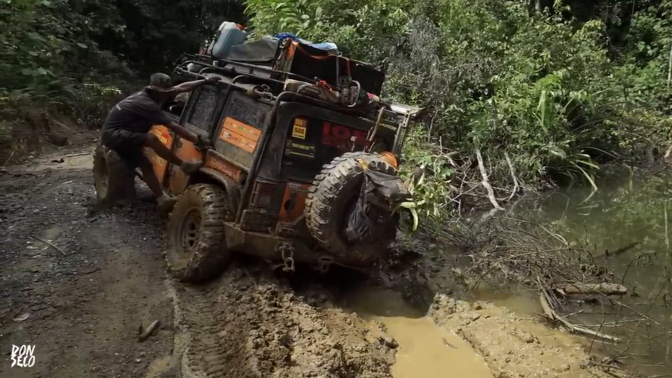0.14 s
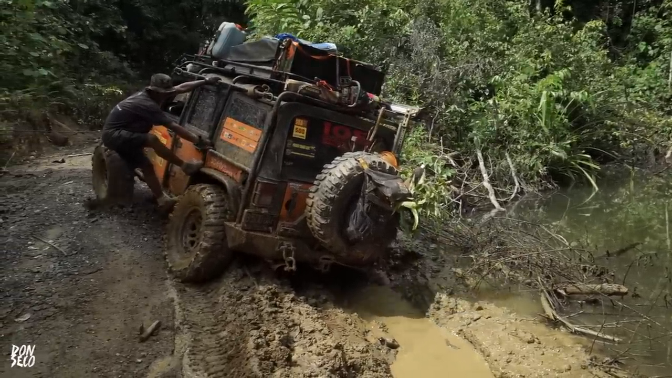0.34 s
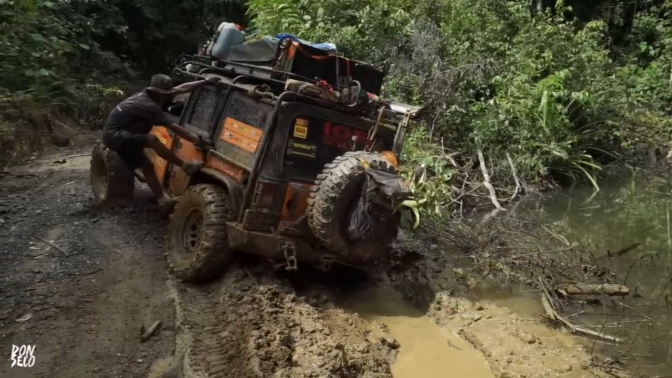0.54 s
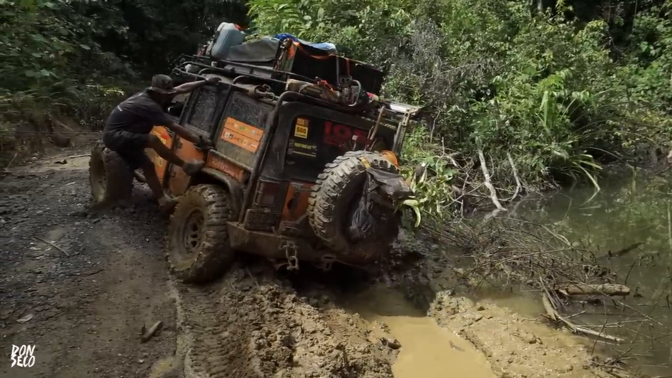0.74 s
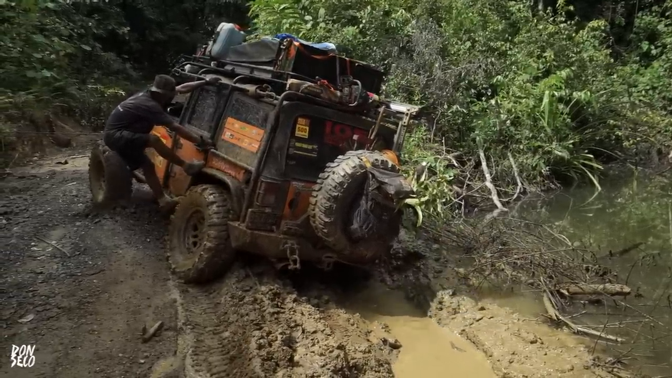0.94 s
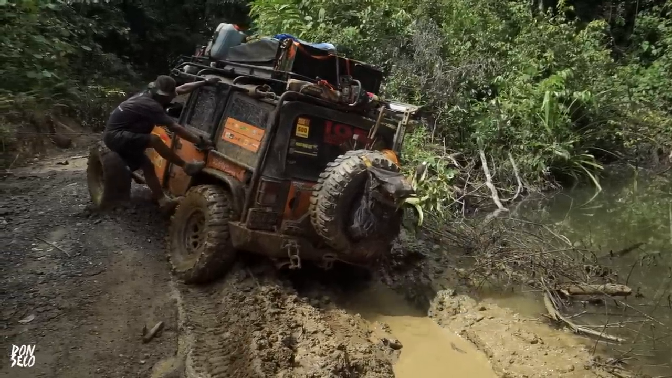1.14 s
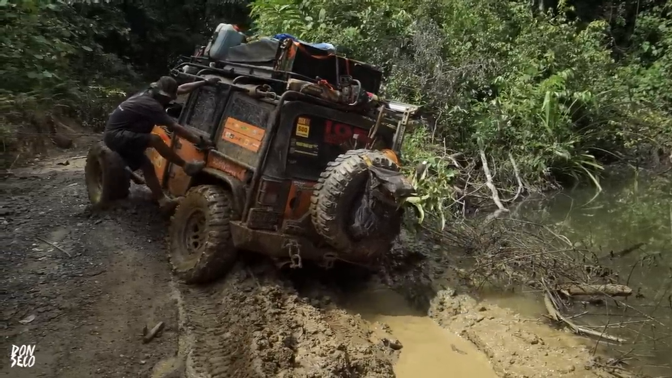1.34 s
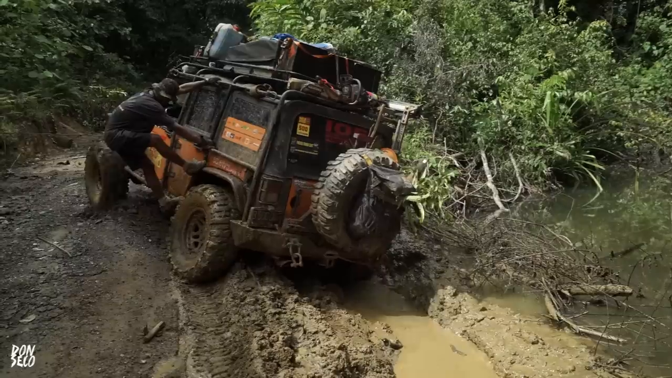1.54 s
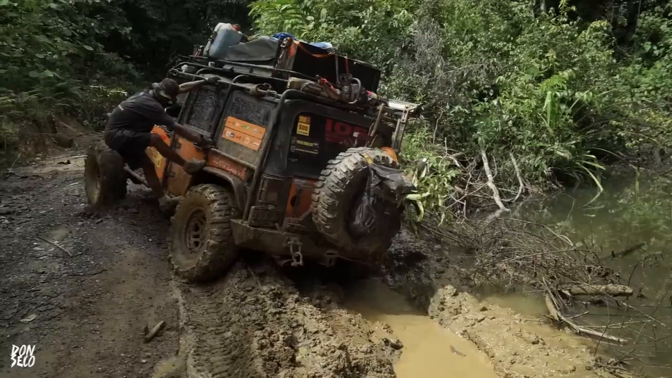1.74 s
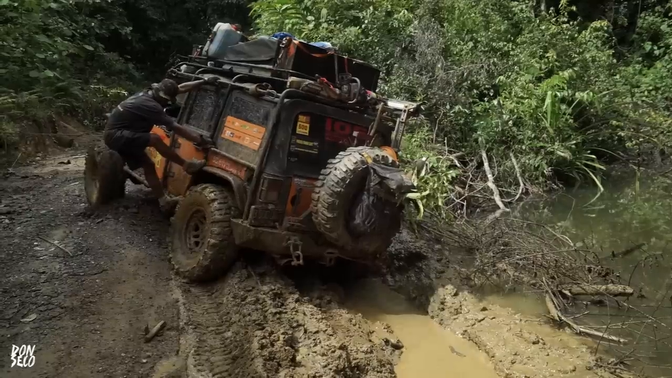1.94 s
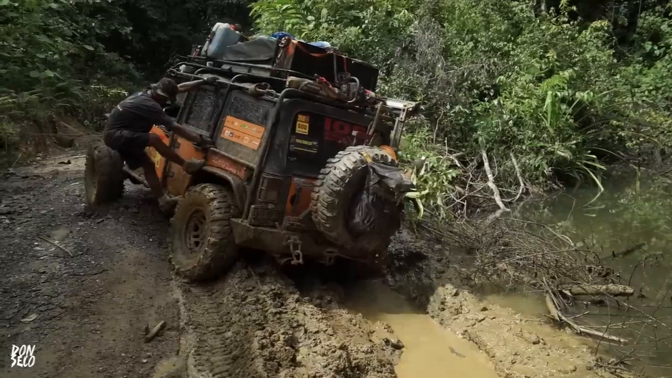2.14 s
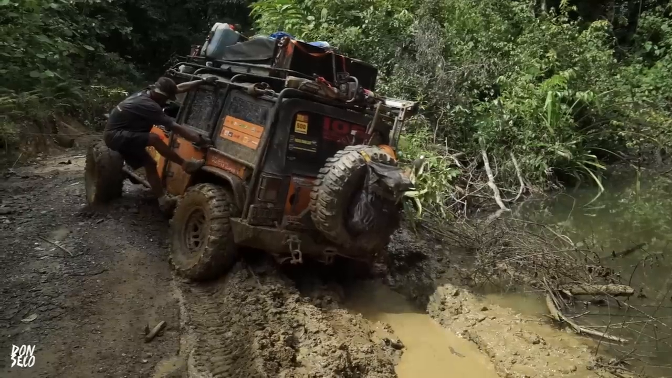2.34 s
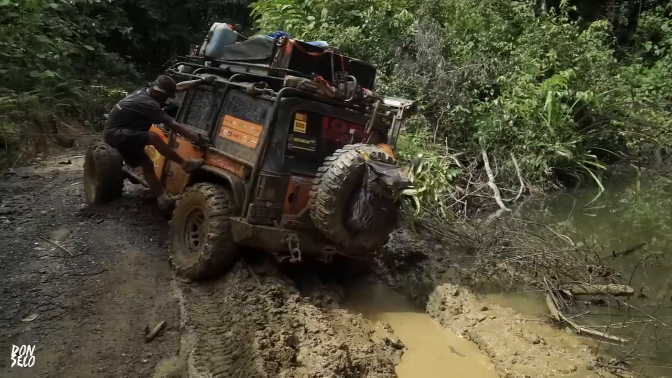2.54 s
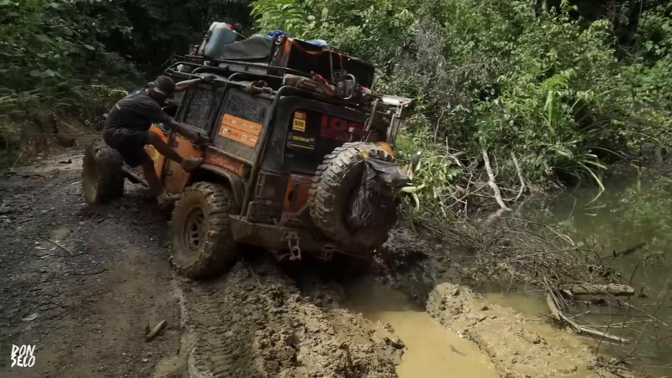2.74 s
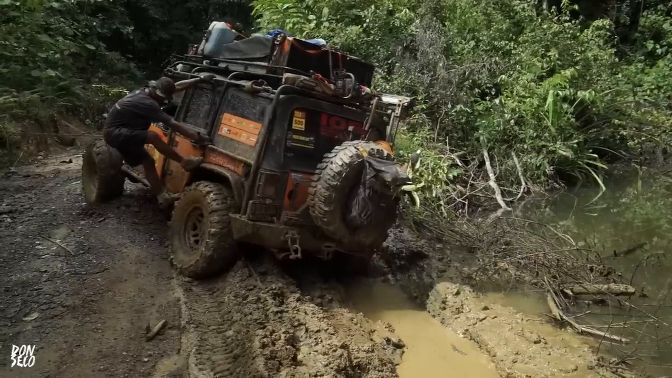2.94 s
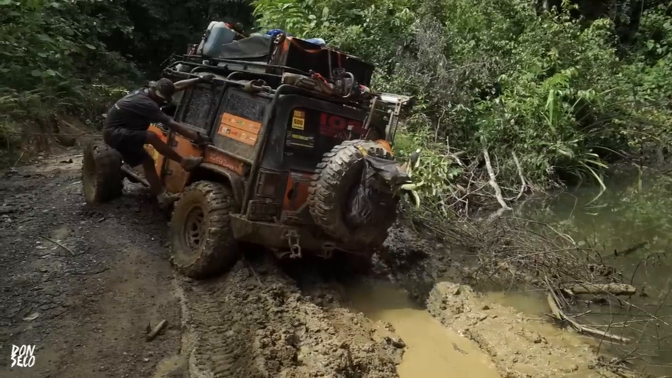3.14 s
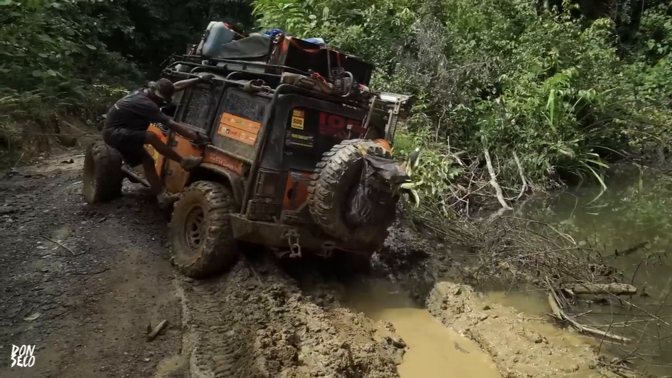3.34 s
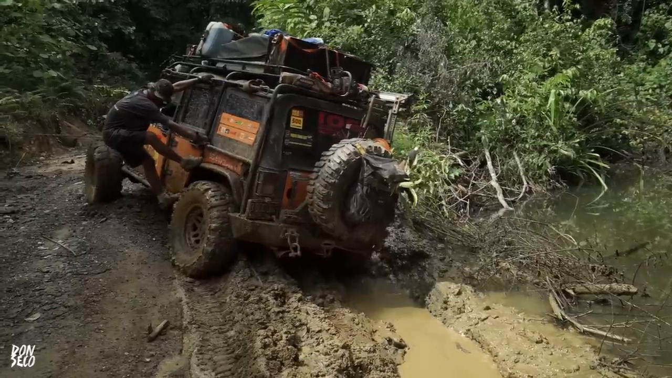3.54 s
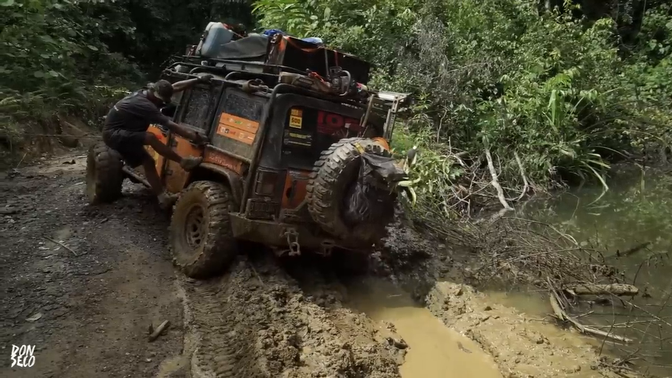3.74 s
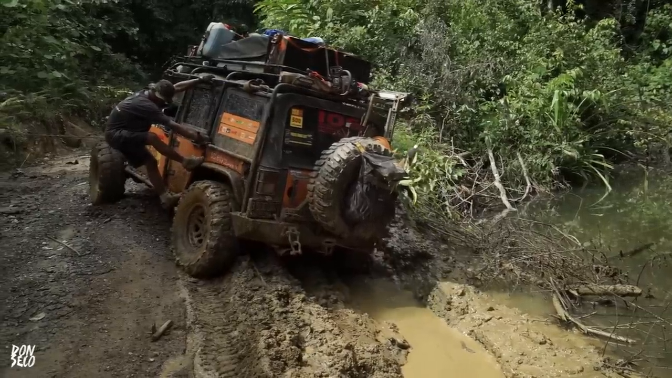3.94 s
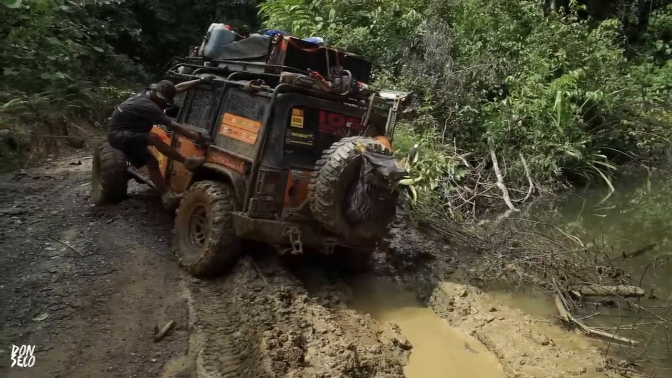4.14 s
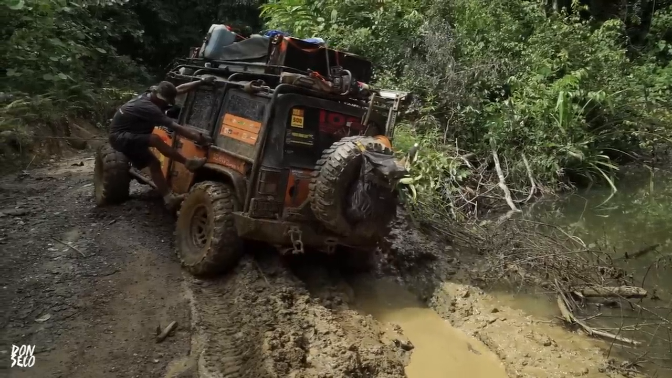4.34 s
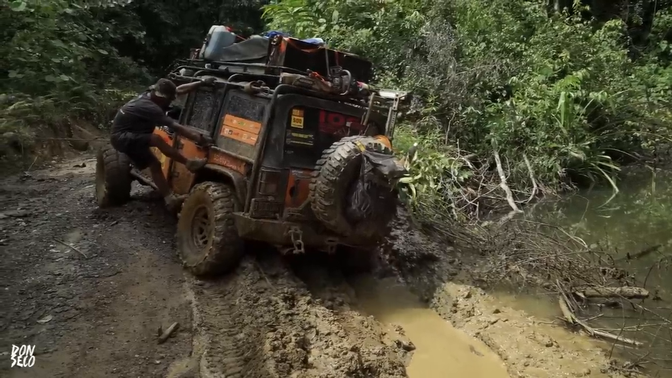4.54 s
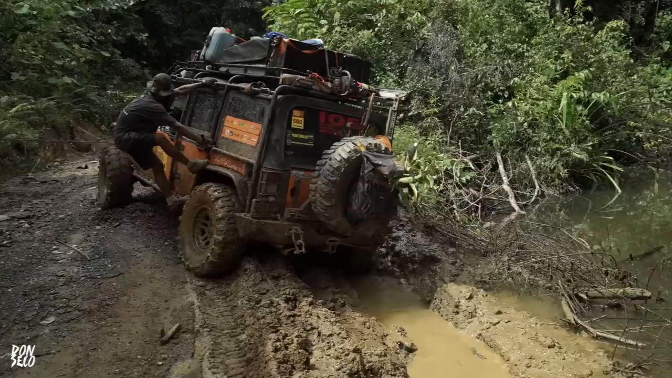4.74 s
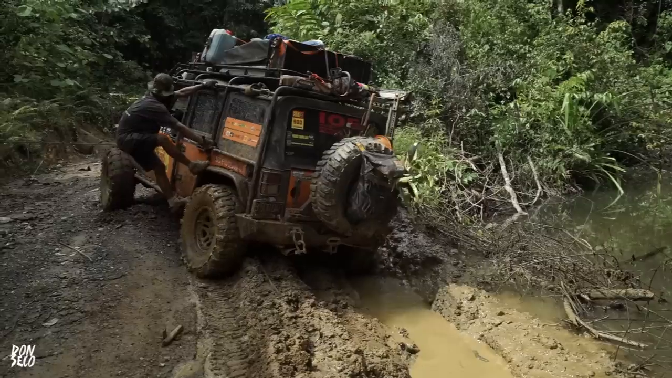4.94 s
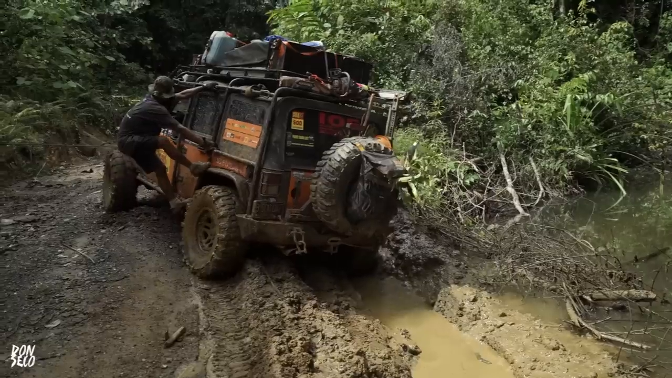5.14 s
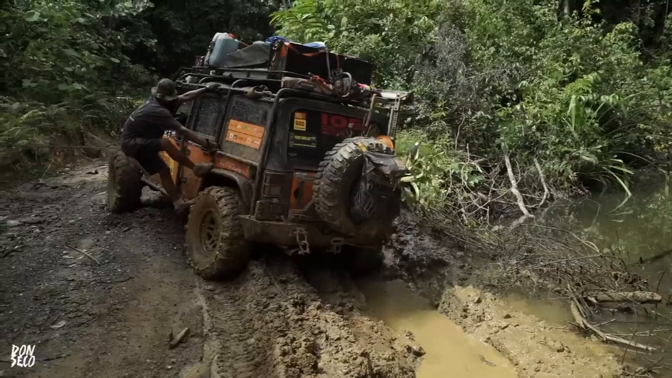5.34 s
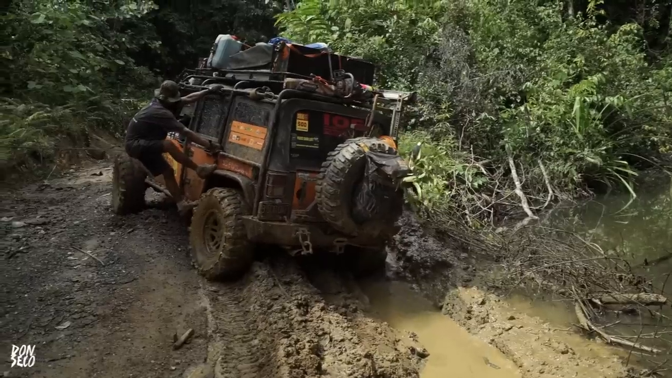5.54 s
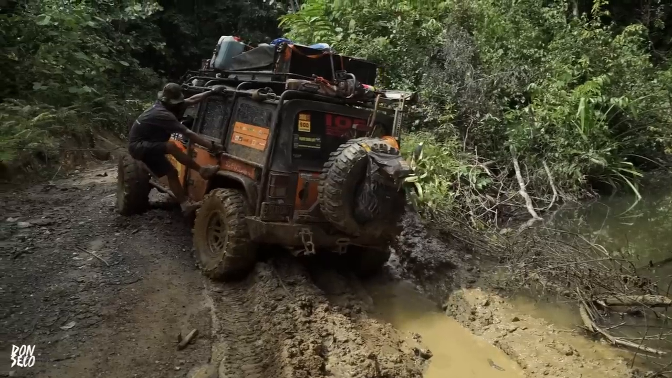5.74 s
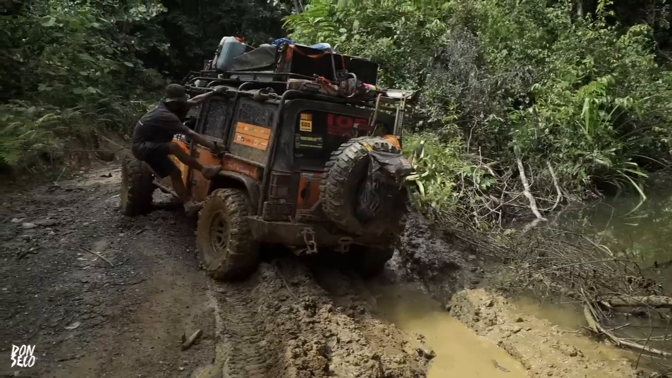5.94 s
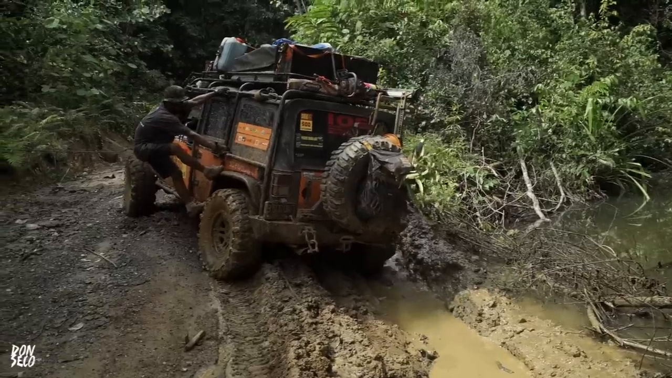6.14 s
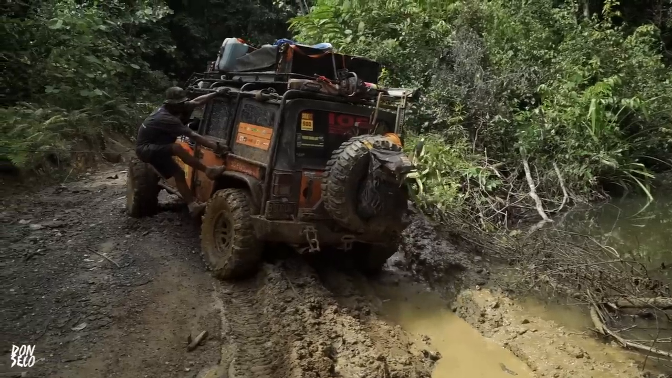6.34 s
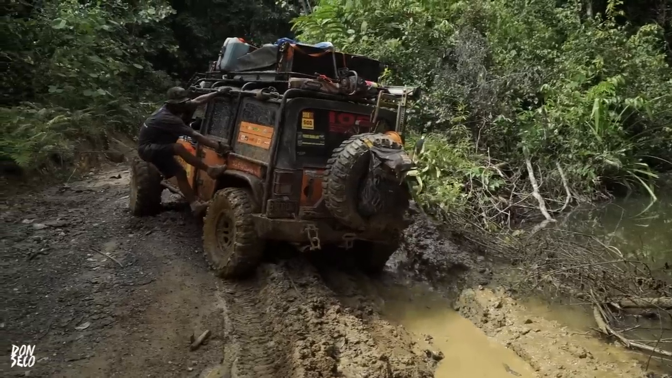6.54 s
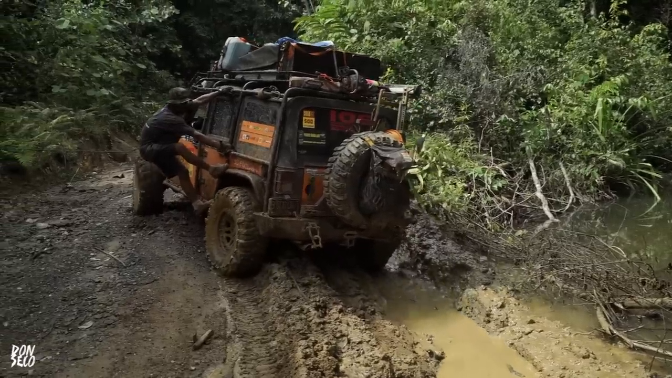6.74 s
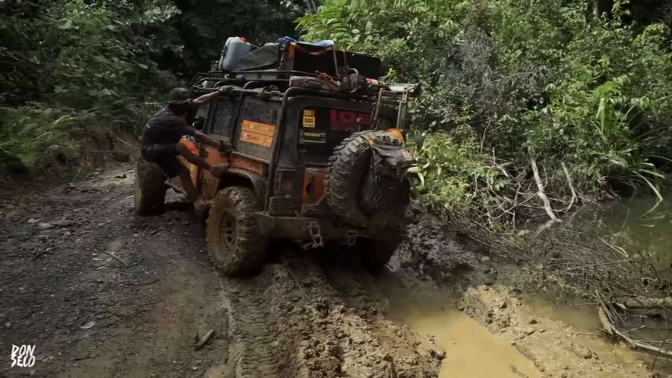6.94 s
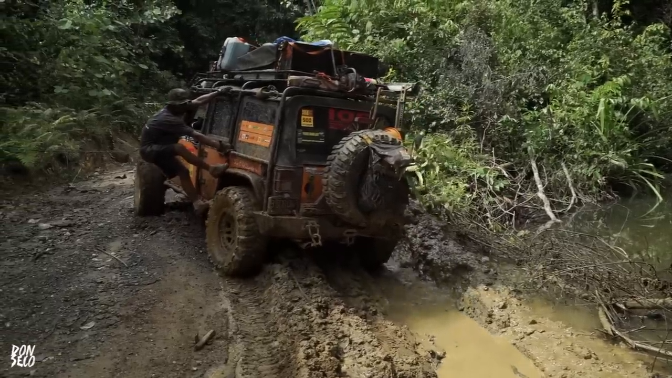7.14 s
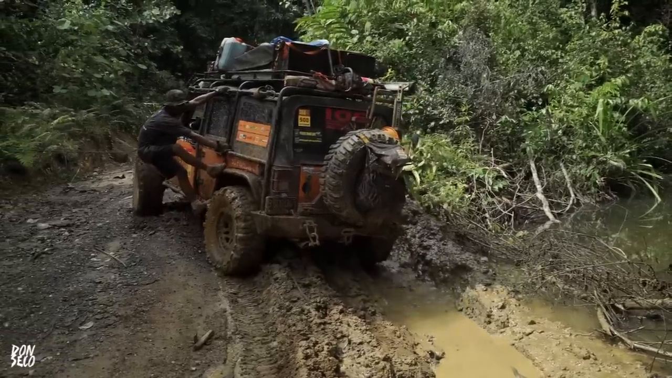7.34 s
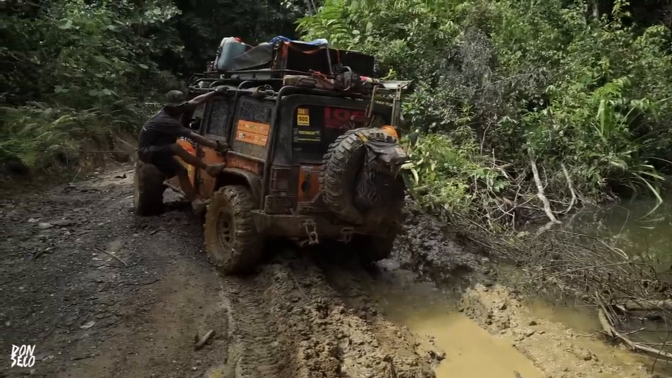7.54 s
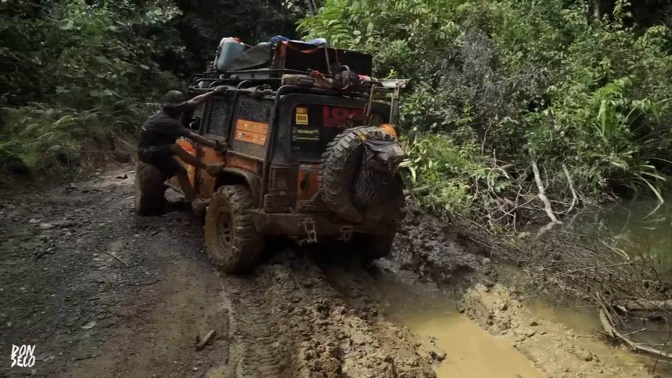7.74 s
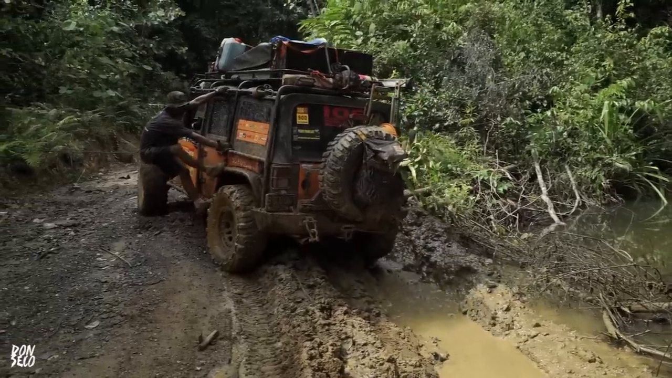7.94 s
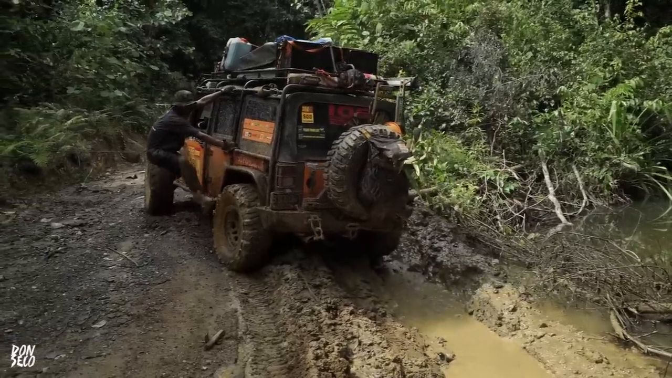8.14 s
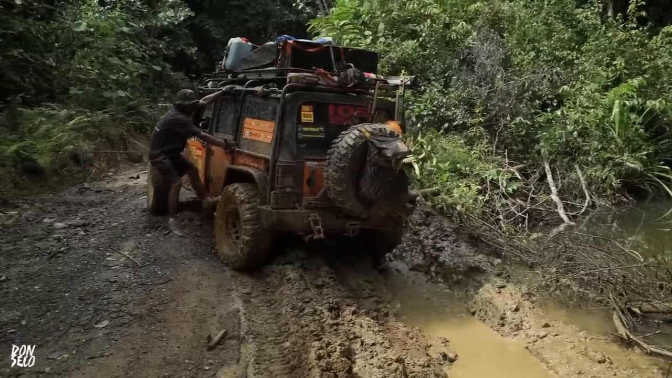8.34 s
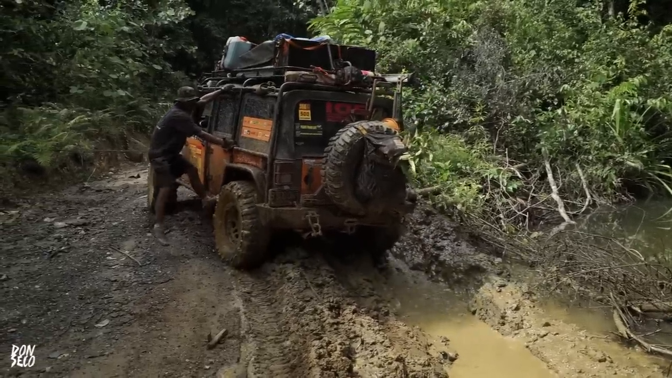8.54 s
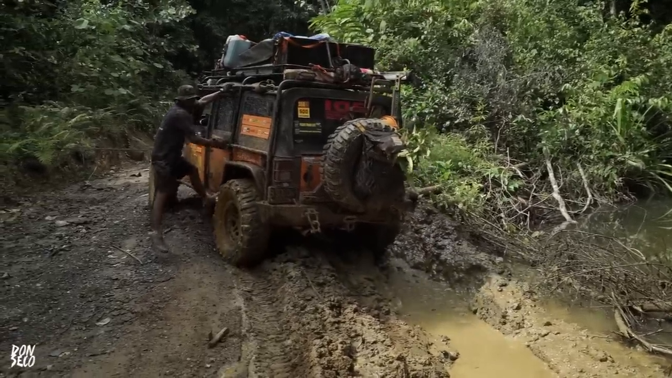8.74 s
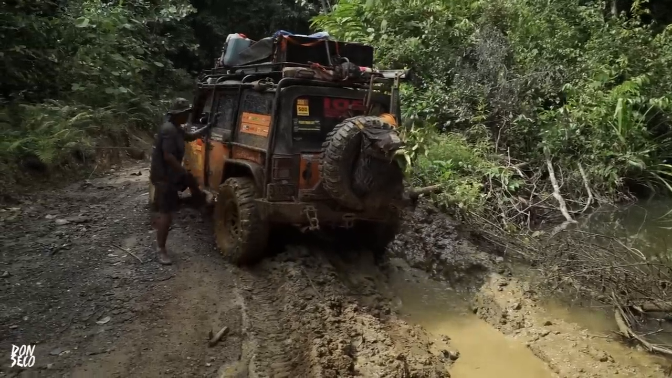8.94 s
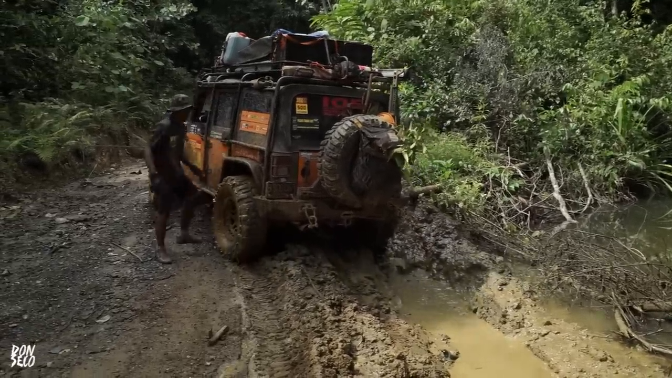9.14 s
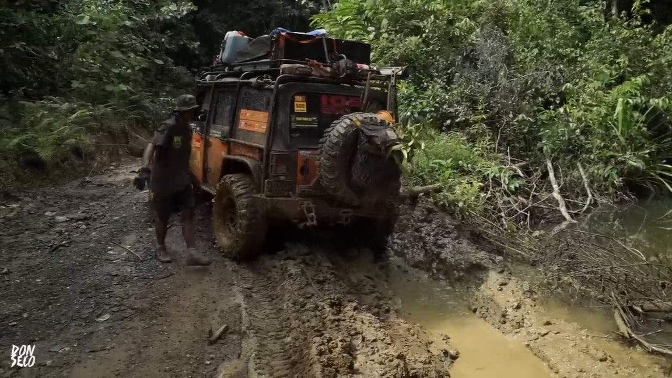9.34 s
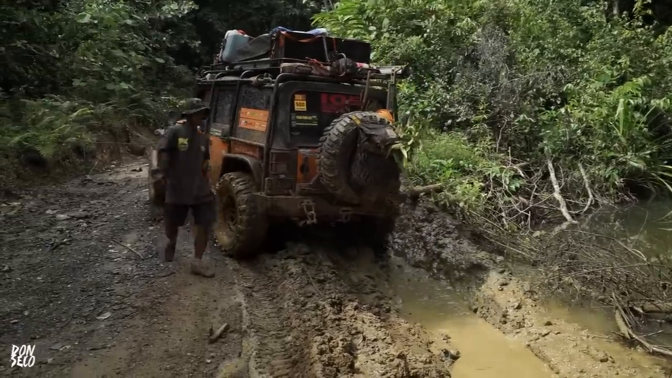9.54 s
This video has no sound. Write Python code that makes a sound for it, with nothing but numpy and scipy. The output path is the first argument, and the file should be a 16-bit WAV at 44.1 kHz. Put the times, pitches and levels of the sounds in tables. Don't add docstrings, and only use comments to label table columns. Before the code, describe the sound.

Continuous booming six-cylinder exhaust dominates, heard from behind the truck in the open, in mono with dull top treble. Revs begin high and raspy, slide down under load, settle into a deep uneven growl, recover slightly in the middle and fall away near the end. Loose driveline knocks cluster around two seconds; faint mud drops tick, one wet slap hits a panel late, with insects and low wind gusts barely audible.

```python
import sys
import numpy as np
from scipy import signal
from scipy.fft import rfft, irfft, next_fast_len
from scipy.io import wavfile
from scipy.ndimage import uniform_filter1d

SR = 44100
rng = np.random.default_rng(int(sys.argv[2]) if len(sys.argv) > 2 else 0)


def output_pcm(signal):
    pcm = np.clip(np.atleast_2d(signal).T, -1, 1) * 32767
    wavfile.write(sys.argv[1], SR, np.round(pcm).astype(np.int16))


def volts_from_db(level):
    exponent = np.asarray(level, float) / 20
    return 10 ** exponent


N = 422919

# start_s, firing_rate_hz, load_db, rasp_db
DRIVE = [(0, 186.2, -1, 2), (.38, 184.3, -0.5, 0.5), (.65, 176, 2, -1), (1.2, 158.9, 1, 0),
         (1.55, 147.3, -1, 17.5), (1.8, 142.2, 0, -1.5), (2.15, 137, 0.5, -1.5), (2.5, 132.4, -1, -5),
         (3.2, 134.9, -0.5, -0.5), (4.0, 128.9, 0, 2), (4.35, 129.4, -0.5, 2), (4.75, 137.3, 0, 2),
         (5.55, 145, 0, 2), (6.5, 145.4, -0.5, 0), (7.9, 149.2, -1, -9), (8.72, 128.7, -1.5, -3),
         (9.1, 114.8, 0, -1.5), (9.6, 107.6, 2, -0.5)]
CYLINDERS = 6
FLYWHEEL_S, HUNT_HZ = 0.12, 0.4

# firing_rate_hz, boom_db, second_db, third_db, fourth_db
HARMONICS = [(104.5, -24, -28, -29.5, -30), (116.54, -24.5, -28, -33.5, -40),
             (129.7, -11.5, -26, -36.5, -33.5), (132.76, -11.5, -20, -28.5, -26.5),
             (137.6, -10.5, -17, -25, -25), (147.7, -11, -12.5, -43, -32.5), (160.8, -10, -21.5, -39, -55),
             (173.7, -14, -29, -41, -46), (181.7, -14.5, -24, -23, -43)]
LOAD_SHARE = [1.0, 1.6, 1.1, 1.1]
RASP_SHARE = [0.0, .1, 1.0, -0.22]
SLIDE_SHARE = [0.0029, -0.024, -0.0045, -.22]
NOTCH_HZ, NOTCH_WIDTH_HZ, NOTCH_DB = 254.7, 2.7, -7

SPEEDS = [112, 132, 147, 183]
# multiple of the cycle rate, then level_db at each speed
CYCLE_LINES = [(1, -18, -27.5, -25.5, -36), (2, -34, -31, -22, -18), (3, -9, -12.5, -19, -32.5),
               (4, -23, -31.5, -28, -26.5), (5, -34, -37.5, -31.5, -22.5), (7, -27, -27.5, -31, -31.5),
               (8, -38, -38, -30, -30), (9, -23, -23.5, -21.5, -40), (10, -44, -36.5, -26.5, -29.5),
               (11, -36, -41, -32.5, -17), (13, -36.5, -30, -22, -29), (14, -33.5, -36, -23, -28),
               (15, -42, -30, -31.5, -24), (16, -35, -32.5, -30.5, -52), (17, -29, -24, -36, -28.5),
               (19, -22, -31, -40.5, -27), (20, -25.5, -36, -64, -28), (21, -39, -46, -50.5, -47),
               (22, -48, -53.5, -56.5, -37), (23, -40, -47, -35, -27.5), (25, -34.5, -31, -38, -41.5),
               (26, -34, -32, -41, -49), (27, -68.5, -39, -53, -32.5), (29, -34, -41.5, -38, -46)]
# multiple of the cycle rate, then level_db at each speed
UPPER_LINES = [(30, -39.5, -46.5, -45, -36), (31, -41, -41.5, -53, -30.5), (35, -50, -51, -39, -50.5),
               (36, -42.5, -37.5, -51, -43), (37, -38.5, -34, -48, -44.5), (42, -50, -52.5, -42.5, -46.5),
               (48, -47, -43.5, -54, -42)]
FAINT_DB, FAINT_DB_PER_LINE = -49, -0.52
UPPER_RASP = 0.7
IMBALANCE_DB, IMBALANCE_LOAD, SLIDE_DB_PER_HZ_S = -0.76, 0.4, -0.0591
SLIDE_SLIP = 0.004
# pitch_hz, width_hz, level_db
PIPE = [(169.8, 55.5, -9.5), (288.7, 44, -4.5), (425.3, 33.6, 4.5), (575, 93, 6), (721, 59, 1.1),
        (774, 142, 1.5), (977, 18, 8), (1110, 91, -3)]

# start_s, level_db
CHURN = [(0, 3.5), (.4, 2), (.8, 2.5), (1.4, -1), (1.9, -1), (2.3, 0.8), (2.65, -0.5), (4, 0.9),
         (4.65, 1.5), (5.3, 0.5), (5.85, -0.1), (6.2, -0.5), (7.16, 2.5), (7.5, 1), (7.9, 0.6), (8.9, -3),
         (9.59, -1.5)]
# pitch_hz, level_db
RUSH_COLOUR = [(25, -23.5), (45, -6.5), (110, -4), (170, -2), (230, -6), (300, 0.5), (480, -4), (570, -3.5),
               (660, -1.5), (800, -4.5), (900, -8), (1300, -16), (1800, -22), (2600, -35)]
RUSH_DB, RUSH_FOLLOWS = -35.5, 0.85
SLIDE_RUSH_DB = 0.0663

# pitch_hz, level_db
CLATTER_COLOUR = [(900, -23.5), (1500, -2.5), (2200, 0.5), (3500, -2), (4500, -5), (5300, -8.5),
                  (6300, -10.5), (9000, -11), (11000, -22.5)]
CLATTER_DB = -51.5
# pitch_hz, width_hz, level_db
BLOCK = [(1300, 110, -0.5), (1640, 240, -6), (2227, 140, -12), (2980, 190, -13.5), (3450, 330, -15.5),
         (4036, 180, -12), (4405, 610, -8), (4960, 150, -13.5)]

# start_s, peak_db, pitch_hz
KNOCKS = [(0.148, -22, 1300), (0.185, -32, 1300), (0.2813, -26, 1315), (0.377, -34, 1150),
          (0.4194, -22, 1440), (0.5671, -35, 1250), (0.9971, -39, 1210), (1.6611, -28, 1393),
          (1.94, -28, 1640), (2.0839, -22, 1300), (2.2629, -20, 1260), (2.3536, -20, 1320),
          (2.7172, -22, 1174), (2.852, -21, 1207), (3.152, -34, 1269), (3.4401, -35, 1362),
          (3.789, -21, 1308), (3.9727, -21, 1158), (4.246, -26, 1227), (4.4543, -23, 1410),
          (4.5291, -30, 1474), (4.882, -18.5, 1485), (5.7828, -30, 1486), (6.8139, -32, 1351),
          (6.9366, -25, 1412), (7.221, -32, 1147), (7.2953, -31, 1707), (7.9069, -31, 1186),
          (8.239, -24, 1354), (8.3474, -27, 1350)]

# start_s, peak_db, brightest_hz, fade_s (time to fall 60 dB)
DROPS = [(.126, -29.5, 4380, 0.028), (.639, -31, 6080, .03), (.876, -40.5, 10000, 0.018),
         (.935, -41, 10000, 0.015), (1.297, -44, 9500, .02), (2.279, -37, 2970, .08),
         (2.403, -31, 4960, .015), (2.488, -40.5, 7570, 0.054), (2.981, -32, 2730, 0.033),
         (3.146, -40, 7400, 0.019), (3.464, -33.5, 4020, 0.023), (3.779, -41, 9500, 0.018),
         (3.997, -37, 3480, .06), (4.072, -39, 10200, 0.041), (4.536, -40.5, 9060, 0.039),
         (4.605, -31, 4370, 0.018), (5, -31.5, 8350, .02), (5.143, -38.5, 8170, 0.047),
         (5.728, -41, 3500, .03), (6.69, -42, 5840, .03), (7.148, -40.5, 4410, .03),
         (8.07, -38.5, 2730, 0.074), (8.788, -47.5, 5700, 0.025), (9.119, -42.5, 6000, 0.03)]

SLAP_S, SLAP_DB, SLAP_FADE_S = 7.292, -33, 0.019
# pitch_hz, level_db
SLAP_COLOUR = [(590, -34), (1000, 1), (2040, -6.5), (2370, -3), (3750, -13.5), (4540, -11), (5010, -18),
               (8520, -14.5), (11000, -24.5), (14200, -60), (22000, -120)]
# pitch_hz, level_db, fade_s (time to fall 60 dB)
PANEL = [(1320, 0, 0.034), (2370, 7.5, 0.065), (3570, -10, 0.075), (4430, -15, 0.13), (5560, 4.5, 0.031),
         (8000, -6, 0.094), (8700, -19, 0.056), (8860, -15.5, 0.06)]

# pitch_hz, level_db
BUSH_COLOUR = [(4500, -28), (6200, -12), (7300, 4.5), (8100, -3), (8900, -2), (9500, -19.5), (11000, -16.5)]
BUSH_DB = -57.5
# start_s, level_db
CRICKET = [(0, -58), (1, -61), (2.4, -69.5), (3.5, -61.5), (4.3, -63.5), (4.7, -57), (5.3, -64), (6.5, -64),
           (8, -67), (9.6, -58.5)]

# middle_s, half_length_s, level_db
GUSTS = [(0, 0.18, -47), (.9, 0.31, -51.5), (1.68, .15, -56), (4, 0.22, -55), (4.9, .4, -58),
         (6.28, 0.27, -48), (7.29, .4, -50.5), (7.66, 0.11, -38), (8.68, .15, -47), (9, .13, -45),
         (9.59, .1, -40.5)]
CALM_DB = -61.5


def evened(x):
    return x / np.sqrt(np.mean(x ** 2) + 1e-20)


def along(rows):
    start_s, *columns = np.transpose(rows)
    return [np.interp(np.arange(N) / SR, start_s, column) for column in columns]


def coloured(x, points):
    point_hz, point_db = np.transpose(points)
    size = next_fast_len(len(x))
    hz = np.fft.rfftfreq(size, 1 / SR)
    gain_db = np.interp(np.log(hz + 1), np.log(point_hz + 1), point_db, left=-90, right=-90)
    return evened(irfft(rfft(x, size) * volts_from_db(gain_db), size)[:len(x)])


def band(x, hz, width):
    edges = [hz - width / 2, hz + width / 2]
    return evened(signal.sosfilt(signal.butter(1, edges, "band", fs=SR, output="sos"), x))


def drift(hz, count):
    z = rng.standard_normal((count, N // 64 + 2))
    z = signal.lfilter(*signal.butter(2, hz * 2 * 64 / SR), z)
    return z / z.std(axis=1, keepdims=True)


def full(slow, step=1):
    return np.interp(np.arange(0, N, step) / 64, np.arange(len(slow)), slow)


def add(mix, s, sound):
    part = mix[round(s * SR):][:len(sound)]
    part += sound[:len(part)]


def drive():
    return uniform_filter1d(along(DRIVE), int(FLYWHEEL_S * SR), axis=1, mode="nearest")


def sliding(hz, step=1):
    return np.maximum(-np.gradient(hz) * SR / step, 0)


def boom(firings, waver_db=0.21, jitter=0.04):
    hz, load_db, rasp_db = drive()
    slide = sliding(hz)
    speeds, *by_speed = np.transpose(HARMONICS)
    chance = drift(14, count=8)
    lean = np.pi / 2 * np.clip((hz - 116) / 14, 0, 1)
    out = np.zeros(N)
    for i, speed_db in enumerate(by_speed):
        k = i + 1
        level_db = np.interp(hz, speeds, speed_db) + LOAD_SHARE[i] * load_db
        level_db += RASP_SHARE[i] * rasp_db + SLIDE_SHARE[i] * slide
        level_db += NOTCH_DB * np.exp(-((k * hz - NOTCH_HZ) / NOTCH_WIDTH_HZ) ** 2)
        level_db += k * waver_db * full(chance[i])
        phase = i * (lean + jitter * full(chance[i + 4]))
        out += volts_from_db(level_db) * np.cos(2 * np.pi * k * firings + phase)
    return np.sqrt(2) * out


def pipe_db(hz):
    power = 0
    for mode_hz, width, db in PIPE:
        power += volts_from_db(db) ** 2 / (1 + (2 * (hz - mode_hz) / width) ** 2) ** 2
    return 10 * np.log10(power)


def faint_lines(count=48):
    named = [round(row[0]) for row in CYCLE_LINES + UPPER_LINES]
    lines = []
    for k in range(1, count):
        if k % CYLINDERS and k not in named:
            level_db = FAINT_DB + FAINT_DB_PER_LINE * (k - 5 * CYLINDERS)
            lines.append((k, *[level_db] * len(SPEEDS)))
    return lines


def lope(firings, uneven_db=0.8, slip=0.12, sweep=0.9, skew=0.08, scatter=0.2, stagger=1.8):
    hz, load_db, rasp_db = (np.pad(curve[::64], (0, 1), "edge") for curve in drive())
    slide = sliding(hz, step=64)
    imbalance_db = IMBALANCE_DB + IMBALANCE_LOAD * load_db + SLIDE_DB_PER_HZ_S * slide
    lines = CYCLE_LINES + UPPER_LINES + faint_lines()
    swells, wanders = drift(4.6, count=len(lines)), drift(3.8, count=len(lines))
    starts, out = rng.standard_normal(len(lines)), 0
    for (k, *speed_db), swell, wander, start in zip(lines, swells, wanders, starts):
        k = round(k)
        near = round(k / CYLINDERS)
        apart = k - near * CYLINDERS
        lag = np.pi / 2 * (near - 1) - sweep * apart ** 2 - skew * apart ** 3 + scatter * start
        lag -= stagger * apart * (near % 2)
        high = (k / 24) ** 2
        level_db = np.interp(hz, SPEEDS, speed_db) + (2.0 + high) * imbalance_db
        level_db += pipe_db(hz * k / CYLINDERS) + uneven_db * swell
        level_db += UPPER_RASP * (apart == 0) * rasp_db
        phase = lag + (slip + SLIDE_SLIP * slide) * (1 + high) * wander
        turn = 2 * np.pi * k / CYLINDERS * firings[::8]
        out += full(volts_from_db(level_db), step=8) * np.cos(turn + full(phase, step=8))
    return np.sqrt(2) * signal.resample_poly(out, up=8, down=1)[:N]


def rush(firings, lumpy_db=1.5):
    puff = 1 + 0.46 * np.cos(2 * np.pi * firings)
    gas = coloured(puff * rng.standard_normal(N), RUSH_COLOUR)
    level_db = RUSH_DB + RUSH_FOLLOWS * along(CHURN)[0] + SLIDE_RUSH_DB * sliding(drive()[0])
    return volts_from_db(level_db + lumpy_db * full(drift(22, count=1)[0])) * gas


def clatter(firings, sharp=0.16, share=0.19, lumpy_db=1.0, ring_share=2.1, patchy_db=1.5):
    chance = np.clip(rng.standard_normal((2000, 1 + len(BLOCK))), -2, 2)
    size = volts_from_db(5.1 * chance)[firings.astype(int)].T
    tick = np.exp(-(firings % 1) / sharp)
    out = coloured((1 + share * size[0] * tick) * rng.standard_normal(N), CLATTER_COLOUR)
    for (hz, width, db), each, patch in zip(BLOCK, size[1:], drift(3.2, count=len(BLOCK))):
        strike = (1 + ring_share * each * tick) * rng.standard_normal(N)
        out += volts_from_db(db + patchy_db * full(patch)) * band(strike, hz, width)
    return volts_from_db(CLATTER_DB + along(CHURN)[0] + lumpy_db * full(drift(13, count=1)[0])) * out


def knocks(fade_s=0.027, under_db=-6):
    out, t = np.zeros(N), np.arange(3000) / SR
    soft_start = 1 - np.exp(-t / 0.00065)
    for (s, db, hz), apart in zip(KNOCKS, rng.uniform(0.82, 0.92, len(KNOCKS))):
        ring = np.sin(2 * np.pi * hz * t) + 0.35 * np.sin(2 * np.pi * hz * apart * t)
        add(out, s, volts_from_db(db + under_db - 60 * t / fade_s) * soft_start * ring)
    return out


def drops(under_db=-3.0):
    out, t = np.zeros(N), np.arange(3000) / SR
    soft_start = 1 - np.exp(-t / 0.00065)
    for (s, db, hz, fade_s), noise in zip(DROPS, rng.standard_normal((len(DROPS), len(t)))):
        colour = [(0.3 * hz, -24), (0.45 * hz, -7), (hz, 0), (1.2 * hz, -8), (3.0 * hz, -20)]
        fade = volts_from_db(db + under_db - 60 * t / np.clip(fade_s, 0.005, 0.3))
        add(out, s, fade * soft_start * coloured(noise, colour))
    return out


def slap(ring_db=-10, second_s=0.0058):
    out, t = np.zeros(N), np.arange(12000) / SR
    burst = volts_from_db(-60 * np.maximum(t - 0.012, 0) / SLAP_FADE_S)
    scatter = volts_from_db(-2.5 - 60 * t / 0.36)
    noise = coloured(rng.standard_normal(len(t)), SLAP_COLOUR)
    add(out, SLAP_S, volts_from_db(SLAP_DB) * (burst + scatter) * noise)
    ring = sum(volts_from_db(db - 60 * t / fade_s) * np.sin(2 * np.pi * hz * t) for hz, db, fade_s in PANEL)
    add(out, SLAP_S, volts_from_db(SLAP_DB + ring_db) * ring)
    add(out, SLAP_S + second_s, volts_from_db(SLAP_DB + ring_db + 2.0) * ring)
    return out


def bush(hz=8550, width=150, throb_db=1.5):
    chorus = volts_from_db(BUSH_DB) * coloured(rng.standard_normal(N), BUSH_COLOUR)
    song = band(band(rng.standard_normal(N), hz, width), hz, width)
    return chorus + volts_from_db(along(CRICKET)[0] + throb_db * full(drift(30, count=1)[0])) * song


def wind():
    t = np.arange(N) / SR
    level = volts_from_db(CALM_DB) + sum(volts_from_db(db) * np.exp(-((t - s) / half) ** 2) for s, half, db in GUSTS)
    return level * coloured(rng.standard_normal(N), [(8, -16), (15, 3.5), (22, 1), (30, -23.5)])


def scene():
    firing_hz = drive()[0] + HUNT_HZ * full(drift(3, count=1)[0])
    firings = np.cumsum(firing_hz) / SR
    truck = boom(firings) + lope(firings) + rush(firings) + clatter(firings) + knocks()
    return (truck + bush() + wind() + drops() + slap())[None]


def low_pass(x):
    return signal.sosfilt(signal.butter(12, 11100, fs=SR, output="sos"), x)


def record(dry):
    edge = np.clip(np.arange(N)[::-1] / 150, 0, 1)
    lowpass = signal.firwin(255, 11200, window=("kaiser", 9), fs=SR)
    limited = signal.oaconvolve(dry, lowpass[None], "same")
    return low_pass(limited * edge)


dry = scene()
out = record(dry)
output_pcm(out)
```